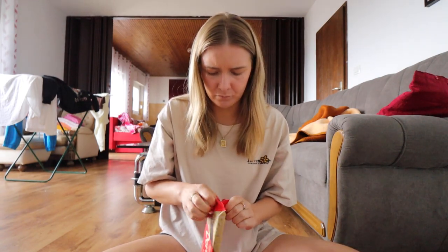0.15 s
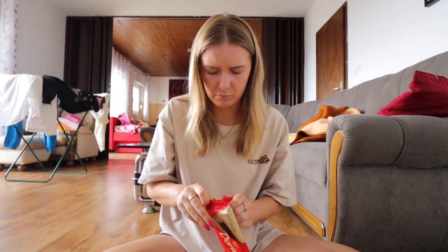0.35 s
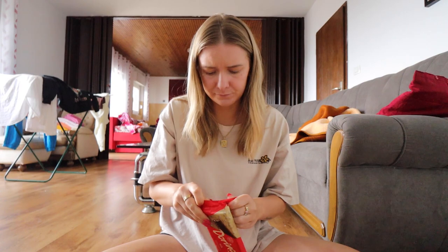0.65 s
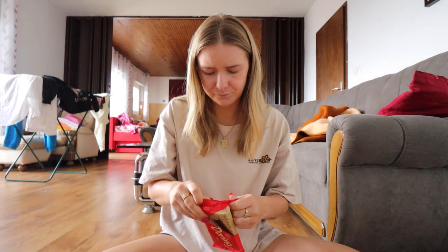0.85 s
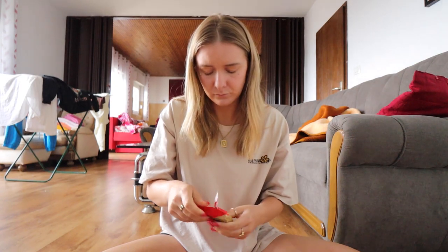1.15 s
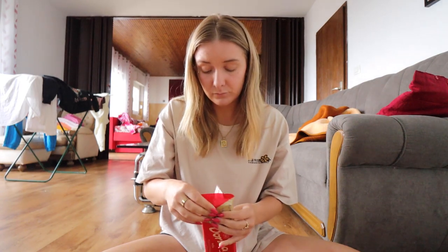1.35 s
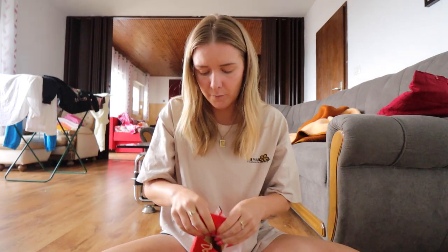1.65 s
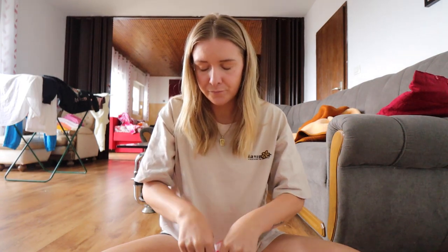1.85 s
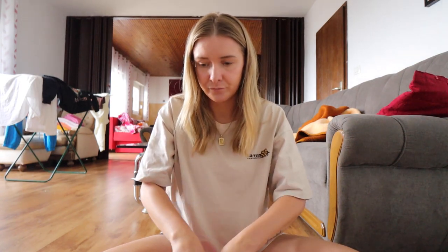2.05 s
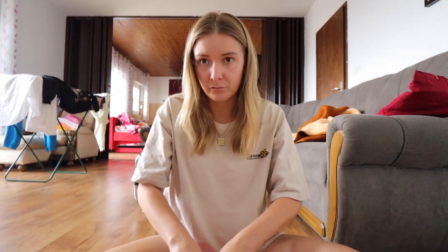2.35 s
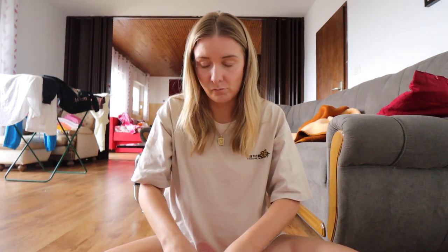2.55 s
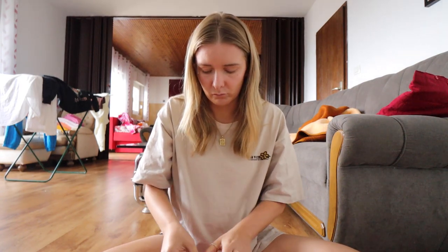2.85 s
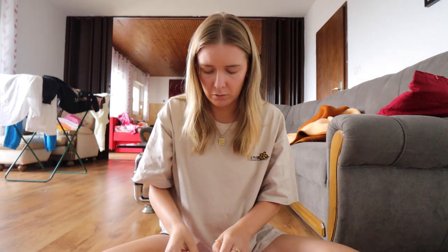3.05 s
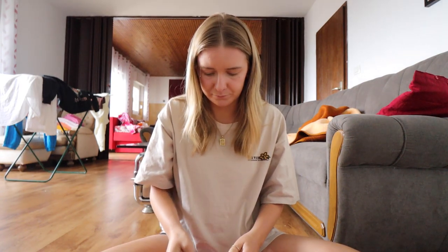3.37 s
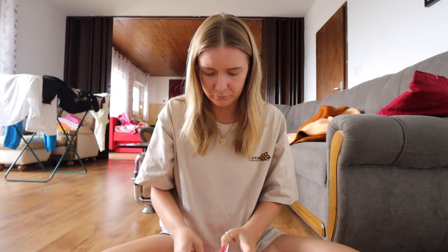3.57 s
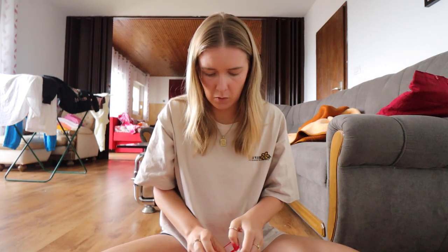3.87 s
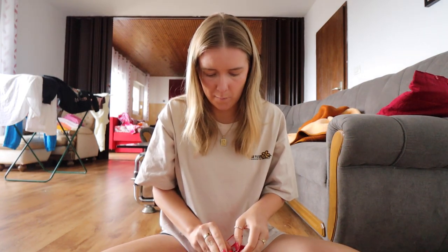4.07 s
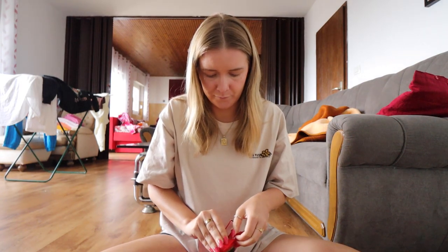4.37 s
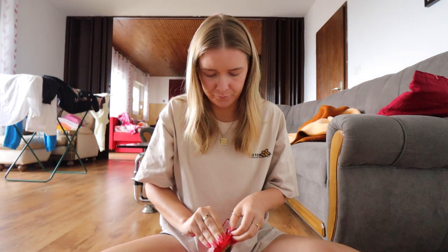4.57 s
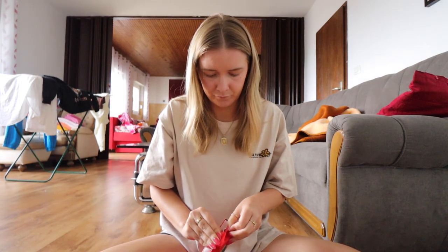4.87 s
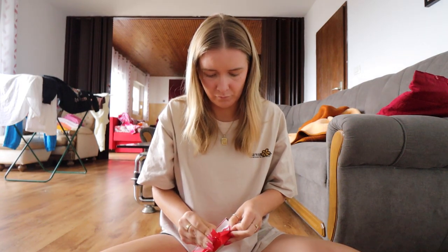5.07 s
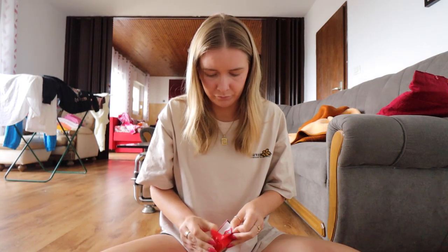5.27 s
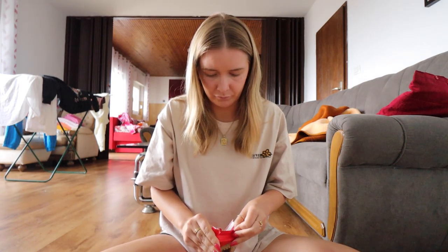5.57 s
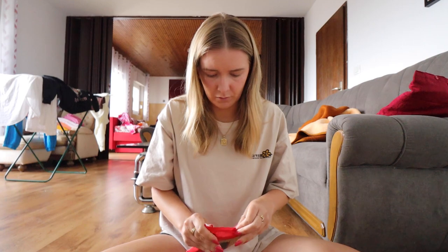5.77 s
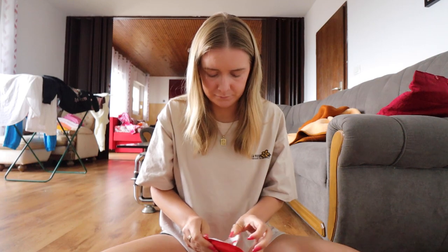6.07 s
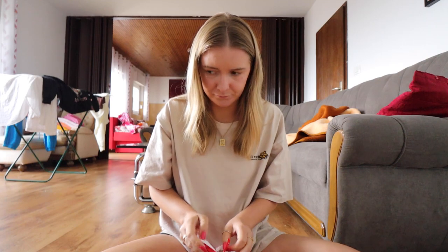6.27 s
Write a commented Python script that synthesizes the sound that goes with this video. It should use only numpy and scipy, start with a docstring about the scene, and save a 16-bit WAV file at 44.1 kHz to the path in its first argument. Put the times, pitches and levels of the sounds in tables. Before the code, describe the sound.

A stiff plastic wrapper crackles and snaps in working hands, fine at first, then sharp loud cracks, in a live living room.

```python
"""First a fine crackle with small snaps, then louder cracks: hands work a stiff plastic wrapper open
just above a wooden floor in a living room, a metre from a camera's microphones.
Each buckling crease is a cluster of tiny damped rings; the floor echoes it at once, then walls and furniture.
Finer crackle follows the squeezes and scatters around the snaps, with a few dull knocks from the bar inside.
Mains hum and soft air noise lie under it all; the microphones colour the sound and widen its treble."""
import sys
import numpy as np
from scipy import signal
from scipy.fft import rfft, irfft
from scipy.io import wavfile
from scipy.ndimage import uniform_filter1d

SR = 44100
rng = np.random.default_rng(int(sys.argv[2]) if len(sys.argv) > 2 else 0)


def bounce(signal):
    """Save signal as a 16-bit WAV file at the path given by the first command-line argument."""
    frames = np.transpose(np.atleast_2d(signal))
    limited = np.clip(frames, -1, 1)
    pcm = np.round(limited * 32767).astype(np.int16)
    wavfile.write(sys.argv[1], SR, pcm)


N = 283122

# Creases that snap, levels before the fixed trims in creases():
# [t/s, level/dB, panel pitch f/Hz, pouch boom/dB re level, crack/dB re level]
SNAPS = [(0.017, -30.5, 3720, -12, 7), (0.0324, -35.5, 4170, -22, 3), (0.06, -41, 3770, -23.5, 4),
         (0.0687, -28.5, 3180, -22, -29), (0.1284, -34, 3780, -30, -18.5), (0.134, -29, 3820, -36, -14),
         (0.152, -35, 3000, -10, -18), (0.2017, -30.5, 4000, -23, 2.5), (0.3012, -29, 2310, -16, -1.5),
         (0.4293, -31, 2060, -13.5, -3.5), (0.5822, -38, 2350, -5, -27), (0.638, -37, 3010, -8, 0),
         (0.6456, -13, 2520, -21, -2.5), (0.6752, -19.5, 2700, -14, 0), (0.691, -19.5, 2525, -24, -18),
         (0.7187, -15.5, 2520, -20, -16), (0.765, -25, 2650, -41.5, -3.5), (0.7941, -30, 3320, -15, -2),
         (0.8491, -28, 1510, -19, -13.5), (1.031, -21, 2050, -16, -5), (1.091, -30.5, 2630, -11, -11),
         (1.159, -33, 2360, -14.5, -4), (1.2326, -39.5, 3500, -6, 1), (1.2707, -47.5, 3200, -1, 13),
         (1.3919, -28.5, 1930, -11, -5.5), (1.4435, -32, 3020, -10, -1), (1.455, -28.5, 2060, -11, 5),
         (1.518, -36.5, 2140, -11, 11.5), (1.5315, -42.5, 3000, -10, 12), (1.5718, -25, 3260, -20, -1),
         (1.6027, -47, 4000, -26, 10), (1.633, -38, 3000, -2, -7.5), (1.7529, -25.5, 3950, -10.5, -1),
         (1.8113, -32, 4000, -20.5, -2), (1.966, -32, 1890, -11.5, -31), (2.052, -33, 1450, -11, -8),
         (2.062, -37.5, 3500, -16, 5), (2.069, -32, 3130, -15, 2.5), (2.087, -34, 4840, -23, -10),
         (2.1541, -39.5, 2490, -6.5, 5), (2.269, -27, 3020, -30, 0), (2.3344, -34, 3040, -15, 8.5),
         (2.5931, -35.5, 4300, -32, -1), (2.6127, -33.5, 1690, -31, 1), (2.6567, -34.5, 3160, -27, 12.5),
         (2.7, -28.5, 2880, -12, -1), (2.712, -30.5, 3010, -9.5, -2), (3.02, -35.5, 3100, -9.5, 3),
         (3.045, -28.5, 2290, -26, 6), (3.0957, -34, 1960, -1, -16), (3.153, -18.5, 2230, -17, -38),
         (3.2007, -32.5, 2787, 3.5, 7.5), (3.221, -35, 2200, -6, -6), (3.229, -37.5, 2980, -12.5, 7.5),
         (3.264, -35.5, 2480, -14, 6.5), (3.282, -36, 3260, -5, 8.5), (3.3615, -23.5, 2100, -2.5, -32),
         (3.4, -41.5, 2990, -23, -1), (3.5469, -24.5, 1430, -11.5, -14.5), (3.588, -25, 2230, -10.5, -4),
         (3.612, -33, 1960, -7.5, 0), (3.659, -36.5, 3430, -12, 15), (3.9862, -34.5, 3100, -9.5, 4),
         (4.0588, -35, 2070, -11, 0), (4.132, -25.5, 1840, -14, -12), (4.202, -31.5, 3180, -25, 0),
         (4.2892, -31, 3387, -12.5, 0), (4.352, -26.5, 3070, -17, -0.5), (4.494, -25.5, 2880, -34, 8),
         (4.53, -25, 3960, -34, -7.5), (4.6437, -37, 2820, -16, -10), (4.7005, -21.5, 2230, -41, -7),
         (4.8352, -24.5, 2190, -17, -9), (4.893, -36, 4200, -12, -7), (4.9242, -25, 2170, -19, 0.5),
         (5.0116, -27.5, 3900, -23, -3.5), (5.089, -14, 2650, -25, 0), (5.132, -34, 3220.0, -27, 9),
         (5.1435, -41, 2360, -9, 15.5), (5.163, -27, 3040, -11, -7), (5.322, -36.5, 1710.0, -15, 0),
         (5.376, -30.5, 3470, -20, -13), (5.39, -33, 2800, -19, -4), (5.4399, -37, 4000, -29, 12),
         (5.696, -19, 2540, -21.5, -7), (5.7165, -34, 3730, -27.5, -3.5), (5.8174, -23.5, 3150, -30, -0.5),
         (5.835, -40, 3566, -17, 13.5), (5.8415, -24.5, 3570, -6, 5.5), (5.847, -27.5, 1200, -15, -4),
         (5.861, -30, 2950, -6, -28), (5.9604, -34, 3320, -3, -24), (6.0437, -25, 2060, -21, -7),
         (6.0785, -21.5, 2500, -21, -8.5), (6.098, -42, 5000, -8, -12), (6.136, -36.5, 5800, -13, -12.5),
         (6.1509, -31, 2946, -20, -6), (6.178, -24, 2530, -9, -6.5), (6.2007, -29.5, 1900, -12, -3.5)]
# Modes of the air pocket in the wrapper: [f/Hz]
POUCH_HZ = [383, 473, 680.6, 870]
# Kinds of ring: [half the pitch reach to either side/octaves, cycles to fade 60 dB, spread of starts/s]
BOOM = (0.15, 8.1, 0.002485)
PANEL = (0.28, 5.2, 0.002227)
CRACK = (0.5, 5.2, 0.000794)
# Summed over all directions a crease is one short click of its own colour; columns as for the rings above
CLICK = (0.27, 2.2, .0002)
CRACK_HZ = 6770
PANEL_OVER_POUCH = 3.6  # a crease wakes the pouch mode nearest to its pitch over this ratio


def creases(rows, count):
    """Buckling rings the panel, booms the pouch and cracks; the walls receive a shorter click."""
    s, db, hz, boom_db, crack_db = np.transpose(rows)[..., None]
    mode = np.argmin(np.abs(hz / PANEL_OVER_POUCH - POUCH_HZ), axis=1)
    pouch_hz = np.take(POUCH_HZ, mode)[:, None]
    crack_hz = CRACK_HZ + 0 * hz  # the same crack pitch for every row
    panel_gain = undb(db - 4.5)
    crack_gain = undb(db + crack_db - 4.5)

    boom = undb(db + boom_db + 5.0) * rings(pouch_hz, *BOOM, count=3)
    panel = panel_gain * rings(hz, *PANEL, count=count)
    crack = crack_gain * rings(crack_hz, *CRACK, count=count)
    panel_click = panel_gain * rings(hz, *CLICK, count=3)
    crack_click = crack_gain * rings(crack_hz, *CLICK, count=3)
    return heard(s, boom + panel + crack, undb(-5.0) * boom + panel_click + crack_click)


LATE_DB = -2.5  # a ring that starts at the end of the spread, against one at its beginning


def rings(hz, octaves, cycles, spread_s, count):
    """One cluster a row: damped sines about a pitch with close starts; energy of rms 1 over 3.4 ms."""
    chance = rng.random((len(hz), count, 3))
    start = spread_s * chance[..., 0] ** 1.805
    start = start - start.min(axis=1, keepdims=True)
    age = np.maximum(np.arange(640) / SR - start[..., None], 0)
    place = 2 * (np.arange(count) + chance[..., 1]) / count - 1  # -1 to 1 across the pitch spread
    ring_hz = np.minimum(hz * 2 ** (2 * octaves * place), .4 * SR)
    turns = ring_hz[..., None] * age
    decay = np.exp(-np.log(1000) * turns / max(cycles, 1))
    soft_start = 1 - np.exp(-3.0 * turns)  # keeps the ring free of thump
    swell = decay * soft_start * undb(LATE_DB * start[..., None] / spread_s)
    strength = np.cbrt(2 * chance[..., 2:] - 1)
    cluster = np.sum(strength * np.sin(2 * np.pi * turns) * swell, axis=1)
    return cluster / np.sqrt(np.sum(cluster ** 2, axis=1, keepdims=True) / 150)


def avalanches(count):
    """Small creases scatter closely around every snap, weaker away from it."""
    s, db, hz, crack_db = np.transpose(SNAPS)[[0, 1, 2, 4], :, None]
    strength_db = db + 10 * np.log10(0.5 + 10 ** (crack_db / 10))
    offset = -0.005 + .027 * rng.exponential(size=(len(s), count))
    hz = np.where(crack_db > 0, CRACK_HZ, hz) + 0 * offset
    moment = np.clip(s + offset, 0, (N - 1) / SR)
    faint_db = strength_db - 24.0 - 150 * np.abs(offset)  # falls 150 dB per second
    return small_creases(moment.ravel(), faint_db.ravel(), hz.ravel())


REST_DB = -70  # crackle of the sheet held still, before the trim in crackle()


def crackle(count):
    """Kneading sets off small creases at random moments, denser the harder it is, each at one squeeze's pitch."""
    t = np.arange(N) / SR
    rest = 10 ** (REST_DB / 10)
    busy = np.cumsum((rest + np.sum(kneading(t), axis=0)) ** .36)
    moment, pick = rng.random((count, 2)).T
    s = np.interp(moment, busy / busy[-1], t)
    # the stronger a squeeze is at that moment, the likelier it gives the pitch
    running = np.cumsum(kneading(s), axis=0)
    squeeze = np.argmax(running >= pick * running[-1], axis=0)
    hz = np.array(SQUEEZES)[squeeze, 3]
    return small_creases(s, 10 * np.log10(rest + running[-1]) - 14.5, hz)


# Squeezes of the fingers, levels before the trim in crackle():
# [t/s of the firmest grip, level/dB, time to let go by 10 dB/s (at least 0.01 is used), crackle pitch f/Hz]
SQUEEZES = [(0.0, -34, 0.09, 5400), (.15, -41, 0.06, 3420), (.26, -43, -0.17, 6930), (.59, -47, 0, 1600),
            (1.0, -38, 0.1164, 4010), (1.245, -40, 0.0147, 5600), (1.35, -41, 0.02, 5700),
            (1.43, -35, 0, 2620), (1.63, -38, 0.14, 4940), (1.88, -45, 0.23, 4730), (2.72, -44, 0.11, 4000),
            (2.95, -44, 0.01, 4300), (3.23, -39, 0.18, 2960), (3.875, -37, 0.11, 3260),
            (3.975, -41, 0.19, 3940), (4.48, -41, 0.1, 4570), (4.62, -45, 0.16, 4500),
            (5.04, -43, -0.02, 6500), (5.46, -45, 0.18, 6000), (5.515, -38.5, 0.12, 2280),
            (6.005, -38, 0.08, 5900), (6.065, -36, 0.0545, 2570), (6.39, -42, 0.23, 3540)]
GRIP_SHARE = .8  # closing the grip takes this share of the time to let go


def kneading(t):
    """Power that drives the fine crackle, one row a squeeze: each swells to its grip and lets go."""
    s, db, release_s = np.transpose(SQUEEZES)[:3, :, None]
    release_s = np.maximum(release_s, .01)
    letting_go = (t - s) / release_s
    closing = (s - t) / (GRIP_SHARE * release_s)
    return 10 ** (db / 10 - np.maximum(letting_go, closing))


# A faint crease rings a narrow patch of the sheet:
# [half the pitch reach to either side/octaves, cycles to fade 60 dB, spread of starts/s]
SMALL = (0.17, 6.2, 0.000973)
STANDOUT_DB = 11.5  # the most the random size adds to a faint crease
STRAY_SHARE = .45  # share of faint creases that stray far from the pitch of their fellows
NEAR_OCTAVES, STRAY_OCTAVES = 0.15, 0.923  # standard deviations of pitch


def small_creases(s, db, hz):
    """Faint narrow rings about a shared pitch, with some pouch boom; most are slight, a few stand out."""
    size, stray, mode, boom = rng.random((len(s), 4)).T[..., None]
    deviation = np.where(stray < STRAY_SHARE, STRAY_OCTAVES, NEAR_OCTAVES)
    octaves = deviation * rng.standard_normal(size.shape)
    gain = undb(db[:, None] + np.minimum(-4.6 * np.log(1 - size), STANDOUT_DB))
    pouch_hz = np.take(POUCH_HZ, (mode * len(POUCH_HZ)).astype(int))
    patch = rings(hz[:, None] * 2 ** octaves, *SMALL, count=2)
    pouch = undb(-8 + 23 * (boom - .5)) * rings(pouch_hz, *BOOM, count=1)
    sound = gain * (patch + pouch)
    return heard(s[:, None], sound, undb(-0.5) * sound)


# The bar inside bumps a hand or the floor: [t/s, level/dB before the envelope, pitch f/Hz]
THUDS = [(0.722, -24, 380), (1.039, -33, 337), (1.368, -29.5, 653), (1.443, -30.5, 425), (1.614, -38, 850),
         (3.156, -35, 208), (6.041, -32, 400), (6.18, -34.5, 210)]


def thuds():
    """Short dull knocks: sines that swell for one cycle and die away within a few more."""
    s, db, hz = np.transpose(THUDS)[..., None]
    turns = hz * np.arange(4000) / SR
    envelope = turns * np.exp(-turns / 1.0)
    return lay(s, undb(db + 10.0) * np.sin(2 * np.pi * turns) * envelope)


FLOOR_S, FLOOR_SHIFT_S, FLOOR_DB = 0.0013318, .0001, -5.5  # the floor echo moves a little with the hands


def heard(s, sound, click):
    """Straight sound with its delayed floor echo, and the click that the walls receive."""
    delay = FLOOR_S + FLOOR_SHIFT_S * rng.standard_normal(s.shape)
    floor = undb(FLOOR_DB) * lay(np.minimum(s + delay, (N - 1) / SR), sound)
    return np.array([lay(s, sound) + floor, lay(s, click)])


# Near echoes: [t/s after the direct sound, left level/dB, right level/dB, extra delay on the right t/s]
ECHOES = [(.0021, -14, -6, 0.0039), (.0065, -14.5, -32, -0.0065), (.011, -9.5, -12, 0.0029),
          (.0205, -19.5, -20.5, -0.016), (.0312, -16, -14.5, 0.01)]
LEFT_DB = -0.89  # left against right, for the direct sound and the tail


def near():
    """Response to each microphone: direct sound and single delayed echoes."""
    out = np.zeros((2, 4000))
    out[:, 0] = undb([LEFT_DB / 2, -LEFT_DB / 2])
    for s, left_db, right_db, lag in ECHOES:
        out[0, int(s * SR)] += undb(left_db)
        out[1, int((s + lag) * SR)] += undb(right_db)
    return out


# Reverberation of the living room: [f/Hz, time to fade 60 dB t/s, relative level/dB]
TAIL = [(214, 0.45, 2), (614, 0.25, -1.5), (1890, 0.36, 2), (6060, 0.36, -7), (12300, 0.34, 0.65)]
ROOM_DB, ROOM_ONSET_S = -2.5, 0.0024
ROOM_ALIKE = 0.28  # gain at which each microphone's tail is mixed into the other


def room():
    """Response to each microphone: dense noise bands, each with its own level and fading at its own rate."""
    t = np.arange(int(.6 * SR)) / SR
    tail_hz, tail_t60, tail_db = np.transpose(TAIL)
    tail = 0
    for hz in 80 * 2 ** np.arange(0, 7.6, .5):
        half_octave = signal.butter(2, [hz, hz * 2 ** .5], "bandpass", fs=SR, output="sos")
        band = signal.sosfilt(half_octave, rng.standard_normal((2, len(t))))
        t60 = np.interp(np.log(hz), np.log(tail_hz), tail_t60)
        db = np.interp(np.log(hz), np.log(tail_hz), tail_db)
        tail = tail + band * undb(db - 60 * t / t60)
    tail = (tail + ROOM_ALIKE * tail[::-1]) * (1 - np.exp(-t / ROOM_ONSET_S))
    tail = tail / np.sqrt(np.sum(tail ** 2, axis=1, keepdims=True))
    balance_db = np.array([[LEFT_DB], [-LEFT_DB]]) / 2
    return undb(ROOM_DB + balance_db) * tail


# Spectrum of the air noise: [f/Hz, relative level/dB per Hz]
AIR = [(32, -14), (55, -5.5), (97, 2.5), (1110, -9.5), (2190, -16.5), (5600, -23.5), (11300, -31.5),
       (15000, -52)]
AIR_DB = -46.5  # rms, before the microphones
HUM_HZ, HUM_DB = 49.2, -49  # centre of the waver; rms, before the microphones


def stillness():
    """Coloured air noise, separate on each side, and a slightly wavering mains hum alike on both."""
    air = colour(rng.standard_normal((2, N)), AIR)
    waver = uniform_filter1d(rng.standard_normal((2, N)), SR // 9)
    waver = waver / rms(waver)
    hum_turns = np.cumsum(HUM_HZ + 0.64 * waver[0]) / SR
    hum_gain = undb(HUM_DB + 0.71 * waver[1])
    hum = np.sqrt(2) * np.sin(2 * np.pi * hum_turns) * hum_gain
    return undb(AIR_DB) * air / rms(air) + hum


def undb(db):
    """Amplitude gain of a level in dB."""
    return 10 ** (np.asarray(db) / 20)


def rms(x):
    """Root mean square along the last axis."""
    return np.sqrt(np.mean(x ** 2, axis=-1, keepdims=True))


def colour(x, points):
    """Shapes a sound by (Hz, dB) points with a causal minimum-phase filter."""
    hz, db = np.transpose(points)
    bins_hz = np.arange(1025) * SR / 2048
    log_gain = np.log(undb(np.interp(np.log(bins_hz + 1), np.log(hz), db)))
    # folding the cepstrum forward in time gives minimum phase
    cepstrum = irfft(log_gain)
    cepstrum[1:1024] *= 2
    cepstrum[1025:] = 0
    response = irfft(np.exp(rfft(cepstrum)))
    return signal.oaconvolve(np.atleast_2d(x), response[None], axes=1)[:, :x.shape[-1]]


def lay(s, sound):
    """Places each row of sound at its moment."""
    out = np.zeros(N + sound.shape[1])
    for start, row in zip(np.abs(s.ravel() * SR).astype(int), sound):
        out[start:start + len(row)] += row
    return out[:N]


def scene():
    """The wrapper, straight and by way of the room, over the stillness."""
    wrapper = creases(SNAPS, count=12) + avalanches(count=8) + crackle(count=1900) + thuds()
    no_bass = signal.butter(2, 150, "highpass", fs=SR, output="sos")  # the wrapper's sound holds little below 150 Hz
    wrapper = signal.sosfilt(no_bass, wrapper)
    straight = signal.fftconvolve(wrapper[:1], near(), axes=1)[:, :N]
    reverberant = signal.fftconvolve(wrapper[1:], room(), axes=1)[:, :N]
    return straight + reverberant + stillness()


# Colour of the camera's microphones: [f/Hz, level/dB]
MIC = [(820, -2.5), (1100, -1.5), (1550, 1.5), (1850, 1), (2250, 0), (5000, 3.5), (12000, 2.5), (14000, -9),
       (16000, -26)]
# Stereo width: [f/Hz, gain of the side signal level/dB]
WIDTH = [(60, -17.5), (150, -2.5), (1500, 3.5), (5000, 8), (12000, 11)]
TOP_HZ = 16200


def record(dry):
    """Microphone colour, narrower bass and wider treble, a hard ceiling and the top cut."""
    left, right = colour(dry, MIC)
    mid = (left + right) / 2
    side = colour((left - right) / 2, WIDTH)[0]
    wide = np.clip([mid + side, mid - side], -1, 1)
    top_cut = signal.ellip(8, .2, 70, TOP_HZ, fs=SR, output="sos")
    return np.clip(signal.sosfilt(top_cut, wide), -1, 1)


dry = scene()
out = record(dry)
bounce(out)
```